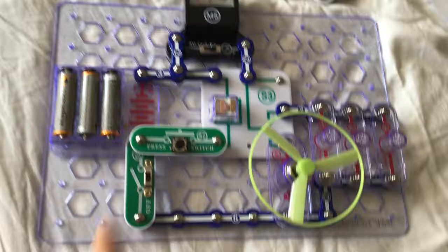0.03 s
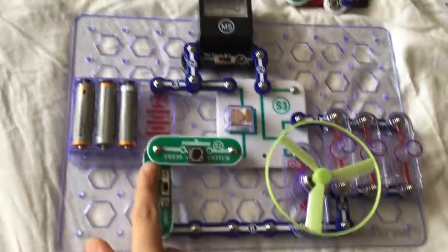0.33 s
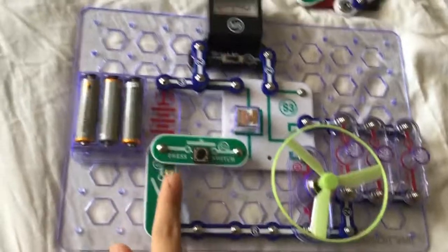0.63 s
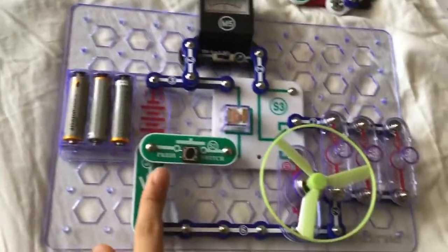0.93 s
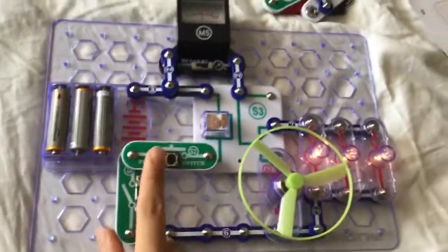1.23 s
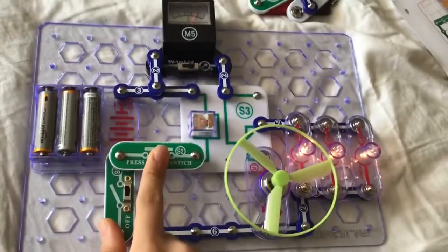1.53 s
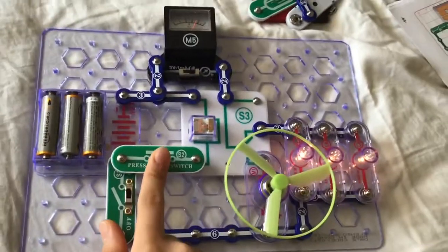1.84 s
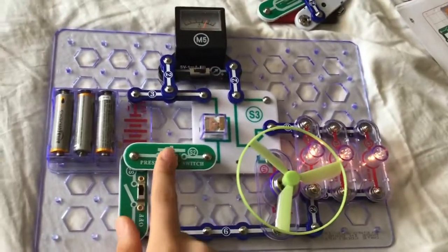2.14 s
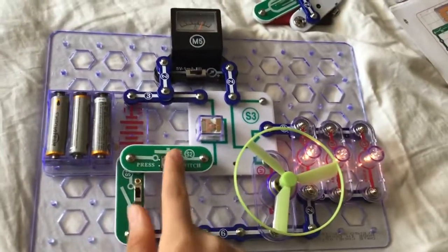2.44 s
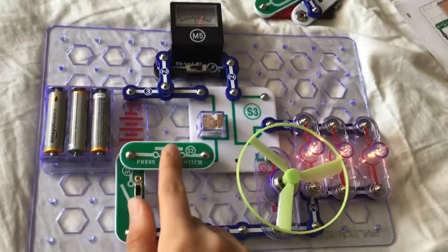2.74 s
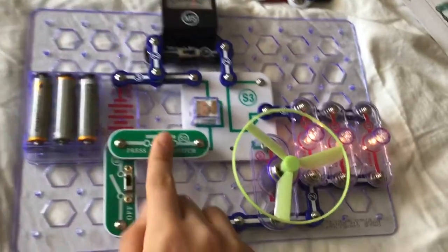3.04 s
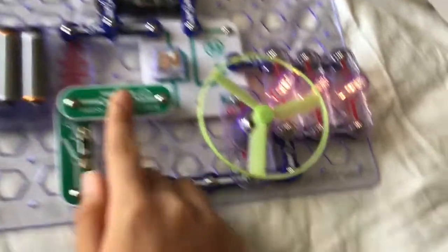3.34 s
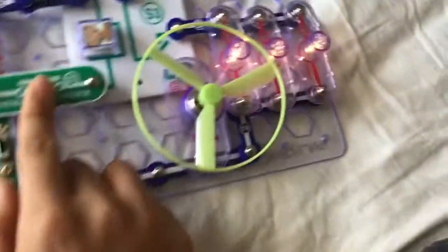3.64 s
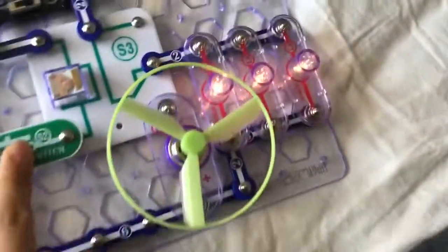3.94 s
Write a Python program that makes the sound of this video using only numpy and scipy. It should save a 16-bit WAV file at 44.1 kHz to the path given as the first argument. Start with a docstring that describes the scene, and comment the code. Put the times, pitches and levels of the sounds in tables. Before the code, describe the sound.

A small relay clicks and chatters on a plastic electronics board. Light finger taps and dry switch ticks come first, from about 0.3 to 0.6 seconds. The relay snaps once at 1.5 seconds, drops back near 1.9, then alternates sharp snaps and duller knocks, five or six pairs a second, until about 4 seconds. Soft handling bumps, faint hiss and low rumble lie beneath, in a small room.

```python
"""A small relay on the plastic board of an electronics kit clicks, then chatters as a finger works a button.
Its armature snaps shut and falls back with a duller knock; each blow rings the case and bends the board,
whose low waves arrive late. Light taps, thuds, scuffs and switch ticks come from the handling.
A small room echoes the blows; low rumble, hiss and faint crackle lie beneath."""
import sys
import numpy as np
from scipy import signal
from scipy.fft import rfft, irfft
from scipy.io import wavfile
from scipy.ndimage import uniform_filter1d

SR = 44100
rng = np.random.default_rng(int(sys.argv[2]) if len(sys.argv) > 2 else 0)


def generate_wav(sig):
    """Save sig (samples, or channels by samples) to the path in sys.argv[1] as 16-bit PCM at SR."""
    pcm = np.round(np.clip(np.atleast_2d(sig).T, -1, 1) * 32767).astype(np.int16)
    wavfile.write(sys.argv[1], SR, pcm)


N = 176400
SIZE = 4096  # samples per blow
HZ, T = np.fft.rfftfreq(SIZE, 1 / SR), np.arange(SIZE) / SR
SCENE_HZ, SCENE_T = np.fft.rfftfreq(N, 1 / SR), np.arange(N) / SR
ROOM_RING = 0.3  # share of resonance lift fed to the room

# band centres: f/Hz
BANDS_HZ = [450, 2100, 3600, 5000, 6900, 9500, 12800]
# armature closing: t/s, ring f/Hz, level/dB per band
SNAPS = [(1.5267, 4340, -4.5, 0.5, 2, 0.5, 4.5, -1.5, 4), (2.0673, 8640, -3.5, 1.5, 2.5, 0.5, 4, 2.5, 2),
         (2.28, 7000, -2, 1.5, 0.5, 0.5, 0, 2.0, 4), (2.4503, 8800, -5, 0, -2.5, -2, -2.5, -3, -13),
         (2.622, 4700, -5.5, -2, -1.5, 0, -11, 3, -4), (2.7847, 4670, -1.5, 1, 1, 2.5, 1, 3.5, -1),
         (2.9764, 4130, -1, 2, -2.5, 0, 1.5, 2.0, -2), (3.163, 5560, -0.5, 2.5, 0, 1, 2, 1.0, 2.5),
         (3.3517, 5720, 0, 1.0, 3, 3, 5, -3, 0), (3.5665, 5020, -2.5, -0.5, 5.5, 1, -4.5, -6.5, -8.5),
         (3.778, 3720, 0, -1, 2.5, -0.5, 2, -3, -14)]
# armature falling back: t/s, level/dB per band
KNOCKS = [(1.9477, -3, 3, 10.5, 4.5, 6, 9, 10), (2.191, -3.5, -6.5, -1.5, -0.5, -13, 0.5, -15),
          (2.381, -0.5, 0, 6, 10, 1, 11, 5), (2.5426, -3, 0, -5.5, 6, -3.5, 5.5, 0),
          (2.706, -0.5, 2.5, -1, -0.5, -5, 4.5, 4.0), (2.8732, -3, -2, 7.5, 8, 1.5, 12, 4),
          (3.0687, -0.5, -5, -3, -2.5, 4, 8, -5), (3.276, -1.5, -3, 3.5, 0.5, 3, 0, 7),
          (3.4682, 1.5, -6.5, -4.5, -2.5, -5, -1.5, -3.0), (3.6901, -0.5, 1, 0.5, 3.5, 3.5, 5, -5.0),
          (3.9097, -1, -7, -4, -5, -9, 4, -7.0)]
# snap spectrum: f/Hz, level/dB
SNAP_COLOUR = [(60, -26), (170, -6.5), (400, 5.5), (800, -2.5), (1200, -13), (1700, -14.5), (2800, -10),
               (3600, -2.5), (4800, 2), (5700, -3), (7700, -9), (10000, -1), (12500, -12.5), (14200, -33),
               (16000, -28)]
# knock spectrum: f/Hz, level/dB
KNOCK_COLOUR = [(60, -26), (170, -4.5), (400, 5), (720, 1.5), (920, 0), (1150, -13.5), (1700, -13.5),
                (2150, -7.5), (2900, -17), (4600, -6.5), (7400, -24), (9500, -15), (12000, -28),
                (14200, -47)]
def relay():
    """The armature snaps shut with a brief ring and falls back with a bouncing knock."""
    out = np.zeros((2, N))
    for s, ring_hz, *band_db in SNAPS:
        blow = contact(push=0.55, bounce=0.46, rattle_s=0.001, scatter_db=-10.5, scatter_s=0.0032)
        ring_db = resonance_db(ring_hz, width_hz=450, lift_db=7.5)
        colour_db = read(SNAP_COLOUR, HZ) + read(list(zip(BANDS_HZ, band_db)), HZ)
        out += strike(s, blow * causal((1 - ROOM_RING) * ring_db), colour_db + ROOM_RING * ring_db)
    for s, *band_db in KNOCKS:
        blow = contact(push=0.35, bounce=1.0, rattle_s=0.00062, scatter_db=-6.5, scatter_s=0.0058)
        out += strike(s, blow, read(KNOCK_COLOUR, HZ) + read(list(zip(BANDS_HZ, band_db)), HZ))
    return out


def contact(push, bounce, rattle_s, scatter_db, scatter_s):
    """Flattened spectrum of a blow: hard push, rebound, rattle and waves scattering in the board."""
    clack_hz, clack_db = 1510, 11  # scattering peaks in the midrange
    rigid_hz = 1060  # below this the board moves as a whole
    bursts = rng.standard_normal((2, SIZE)) * np.exp(-T / np.array([[rattle_s], [scatter_s]]))
    rattle, scatter = (rfft(burst / np.linalg.norm(burst)) for burst in bursts)
    scatter *= amp(scatter_db + clack_db * np.exp(-2 * np.log((HZ + 1) / clack_hz) ** 2))
    rebound = bounce * np.exp(-2j * np.pi * HZ * rng.uniform(0.000611, 0.001057))
    loose = (rebound + rattle) * highpass(2500) + scatter
    blow = push + loose * highpass(rigid_hz) ** 2
    smooth_power = uniform_filter1d(abs(blow) ** 2, size=70)
    return blow * causal(-10 * np.log10(smooth_power + 1e-9))


def strike(s, blow, colour_db):
    """One blow on two tracks: near, and spread to all sides, where its fine ripple evens out."""
    out, colour = np.zeros((2, N)), causal(colour_db)
    add(out[0], s, pulse(colour * blow))
    add(out[1], s, pulse(colour))
    return out


# case and board resonances: f/Hz, width/Hz, lift/dB
MODES = [(253, 17, 6), (563, 65, 4.5), (617, 13.3, 8.5), (890, 71, 9), (1320, 114, 8), (2000, 262, 11),
         (2341, 146, 12.5), (3230, 200, 6), (4160, 190, 7), (6970, 280, 8), (8560, 580, 7),
         (12970, 550, 11)]
def board(x, ring):
    """Case and board resonate; bending waves carry bass slower than treble."""
    lift_db = sum(resonance_db(*mode) for mode in MODES)
    delay_s = 0.001518 * (1016.5 / (HZ + 90)) ** 0.947
    phase_turns = np.cumsum(delay_s - delay_s[-1]) * HZ[1]
    response = pulse(causal(ring * lift_db) * np.exp(-2j * np.pi * phase_turns))
    return signal.fftconvolve(x, response)[:N]


# finger taps: t/s, level/dB, tilt/(dB/decade), rattle decay/s
TAPS = [(0.29, -18, 6, 0.003), (.394, -17, -5.5, 0.0045), (1.3, -34, 23.5, 0.0022),
        (2.223, -21.5, 15, 0.0015)]
# tap spectrum: f/Hz, level/dB
TAP_COLOUR = [(80, -19), (400, 4.5), (800, 1.5), (1400, -7), (3000, -6.5), (4300, 1.5), (6000, -16.5),
              (9500, -14.5), (15000, -40)]
def taps():
    """A finger lightly strikes the board."""
    out = np.zeros((2, N))
    for s, db, tilt, rattle_s in TAPS:
        blow = contact(push=0.32, bounce=0, rattle_s=rattle_s, scatter_db=-0.5, scatter_s=0.007)
        out += strike(s, blow, db + read(TAP_COLOUR, HZ) + tilt * np.log10((HZ + 200) / 2000))
    return out


# button spectrum: f/Hz, level/dB
BUTTON_COLOUR = [(500, 4), (1000, 12.5), (1500, 4), (2500, 10), (3100, 10), (4200, -15)]
def button():
    """The button gives way under the finger once, then again just before each knock."""
    out = np.zeros((2, N))
    first_s, first_db, lead_s, repeat_db = 1.8922, -31.5, 0.008, -33.5
    for s, db in [(first_s, first_db)] + [(knock[0] - lead_s, repeat_db) for knock in KNOCKS]:
        blow = contact(push=0.29, bounce=0, rattle_s=0.00063, scatter_db=-11, scatter_s=0.004)
        out += strike(s, blow, db + read(BUTTON_COLOUR, HZ))
    return out


# board thuds: t/s, f/Hz, level/dB, decay/s
THUDS = [(0.291, 83.4, -49.5, 0.042), (2.995, 185, -39.5, 0.0076), (3.346, 150, -39.5, 0.014),
         (3.896, 197, -29, 0.0038)]
def thuds():
    """The board bumps on cloth: low damped sines."""
    out, rise_s = np.zeros(N), 0.00087
    for s, hz, db, decay_s in THUDS:
        envelope = (1 - np.exp(-T / rise_s)) * np.exp(-T / decay_s)
        add(out, s, amp(db) * envelope * np.sin(2 * np.pi * hz * T))
    return out


# hand scuffs: t/s, rise/s, decay/s, level/dB, centre f/Hz
SCUFFS = [(.916, 0.017, 0.0075, -61, 1820), (1.106, .016, 0.059, -63, 895),
          (1.392, 0.02, 0.0036, -60, 3370), (1.455, 0.0098, 0.0065, -65, 3880)]
def scuffs():
    """Skin rubs on plastic: friction noise swells and dies."""
    out = np.zeros(N)
    for s, rise_s, decay_s, db, centre_hz in SCUFFS:
        octaves = np.log2((SCENE_HZ + 1) / centre_hz)
        friction = noise(np.exp(-0.5 * octaves ** 2))
        envelope = np.minimum(SCENE_T / rise_s, 1) * np.exp(-np.maximum(SCENE_T - rise_s, 0) / decay_s)
        add(out, s, amp(db) * friction * envelope)
    return out


# switch ticks: t/s, level/dB
TICKS = [(.4858, -26.5), (.5318, -21), (.5745, -36)]
# tick spectrum: f/Hz, level/dB
TICK_COLOUR = [(1200, -15), (4000, 0), (7500, 3.5), (10000, -9), (15000, -33)]
def slide_switch():
    """The handled switch gives dry ticks with no ring."""
    out = np.zeros(N)
    for s, db in TICKS:
        add(out, s, pulse(causal(db + read(TICK_COLOUR, HZ))))
    return out


# early reflections: delay/s, level/dB
ECHOES = [(.0111, -21.5), (.0198, -27)]
# tail spectrum: f/Hz, level/dB
ROOM_COLOUR = [(150, -2), (500, -15), (1000, -8), (2200, -7), (4300, -8.5), (7000, -5.5), (10000, -15.5),
               (14000, -21)]
# tail decay: f/Hz, T60/s
ROOM_T60 = [(200, 0.25), (1200, 0.15), (4500, 0.34), (8000, 0.29), (14000, 0.35)]
def room(x):
    """Near surfaces echo; three crossfaded diffuse tails vary the decay from click to click."""
    out, size, crossfade_hz = np.zeros(N), 2 ** 15, 0.7
    bright = signal.sosfilt(signal.butter(1, 1500, "high", fs=SR, output="sos"), x)
    for delay_s, db in ECHOES:
        add(out, delay_s, amp(db) * bright)
    onset = np.clip((SCENE_T[:size] - 0.004) / 0.0032, 0, 1)
    for k in range(3):
        hz, t, spectra = signal.stft(rng.standard_normal(size), SR, nperseg=256)
        t60_s = read(ROOM_T60, hz)[:, None]
        unit_energy = np.sqrt(2 * np.log(1000) / (t60_s * SR))
        spectra *= amp(read(ROOM_COLOUR, hz)[:, None] - 60 * t / t60_s) * unit_energy
        tail = signal.istft(spectra, SR, nperseg=256)[1][:size] * onset
        share = np.sqrt(2 / 3) * np.cos(2 * np.pi * (crossfade_hz * SCENE_T + k / 3))
        out += signal.fftconvolve(x * share, tail)[:N]
    return out


# rumble and hiss spectrum: f/Hz, relative level/dB
AIR_COLOUR = [(40, -35), (62, 0.5), (85, 0.5), (170, -7), (240, -8.5), (400, -16), (1000, -25.5),
              (1650, -32), (2300, -25), (3000, -32.5), (4100, -30.5), (5700, -35.5), (10200, -35.5),
              (12000, -44), (13500, -41.5), (16000, -47)]
# hiss drift: t/s, gain/dB
HISS_GAIN = [(.3, 0.7), (1.5, -1.34), (3.9, 5)]
def rumble_and_hiss():
    """Steady room rumble under a hiss that dips slightly, then swells."""
    air = amp(-59.5) * noise(amp(read(AIR_COLOUR, SCENE_HZ)))
    rumble = signal.sosfiltfilt(signal.butter(2, 300, fs=SR, output="sos"), air)
    hiss = (air - rumble) * amp(np.interp(SCENE_T, *np.transpose(HISS_GAIN)))
    return rumble + hiss


# wash spectrum: f/Hz, relative level/dB
WASH_COLOUR = [(500, -31), (2300, 1), (3000, -4), (4000, 5), (5500, -8.5), (7200, -4.5), (12000, -30)]
def wash():
    """Treble noise dies away at the start."""
    start_db, hold_s, t60_s = -64.5, 0.15, 0.88
    envelope = amp(start_db - 60 * np.maximum(SCENE_T - hold_s, 0) / t60_s)
    return noise(amp(read(WASH_COLOUR, SCENE_HZ))) * envelope


def crackle():
    """Faint, uneven electrical ticks in the high treble."""
    out = np.zeros(N)
    rate_per_s, pitch_hz, level_db = 56, 9700, -57
    pip = amp(level_db) * np.exp(-(T / 0.00017 - 2) ** 2) * np.sin(2 * np.pi * pitch_hz * T)
    for k, jitter in enumerate(rng.uniform(0, 0.8, size=300)):
        add(out, (k + jitter) / rate_per_s, pip)
    return out


def amp(db):
    """Decibels to gain."""
    return 10 ** (np.asarray(db) / 20)


def read(points, hz):
    """Table lookup on a log-frequency axis."""
    table_hz, value = np.transpose(points)
    return np.interp(np.log(hz + 1), np.log(table_hz + 1), value)


def add(mix, s, sound):
    """Mixes a sound in at s seconds."""
    part = mix[round(s * SR):][:len(sound)]
    part += sound[:len(part)]


def resonance_db(hz, width_hz, lift_db):
    """Bell-shaped lift of one resonance."""
    return lift_db / (1 + (2 * (HZ - hz) / width_hz) ** 2)


def highpass(corner_hz):
    """First-order high-pass spectrum."""
    return 1j * HZ / (1j * HZ + corner_hz)


def causal(db):
    """Minimum-phase spectrum with this gain."""
    log_gain = np.log(amp(np.concatenate([db, db[-2:0:-1]])))
    return np.exp(np.conj(signal.hilbert(log_gain)))[:len(db)]


def pulse(spectrum):
    """Spectrum to short sound, faded out."""
    return irfft(spectrum) * np.cos(np.pi / 2 * T / T[-1]) ** 2


def noise(gain):
    """Noise shaped by a gain per frequency, rms 1."""
    x = irfft(rfft(rng.standard_normal(N)) * gain, N)
    return x / np.sqrt(np.mean(x ** 2) + 1e-20)


def scene():
    """Relay and finger ring the board and the room, over the background."""
    near, spread = relay() + taps() + button()
    direct = board(near + thuds() + scuffs(), ring=0.93)
    reverb = room(board(spread, ring=ROOM_RING))
    return (direct + reverb + slide_switch() + rumble_and_hiss() + wash() + crackle())[None]


def record(dry):
    """A moment of opening silence, then a steep low-pass."""
    silence_s, cutoff_hz = 0.074, 16200
    lowpass = signal.firwin(511, cutoff_hz, window=("kaiser", 9), fs=SR)
    return signal.oaconvolve(dry * (SCENE_T > silence_s), lowpass[None], "same")


dry = scene()
out = record(dry)
generate_wav(out)
```